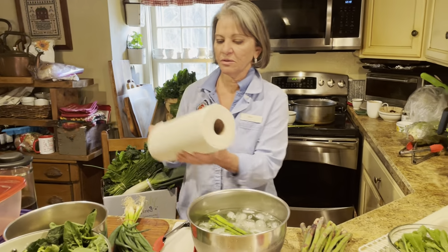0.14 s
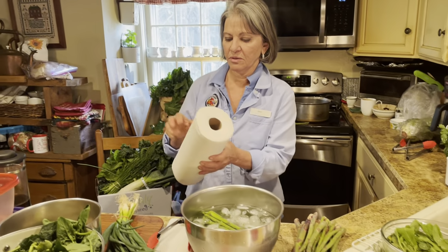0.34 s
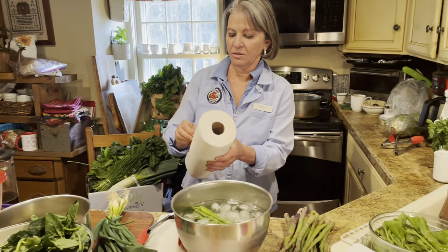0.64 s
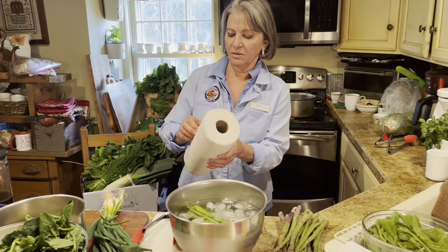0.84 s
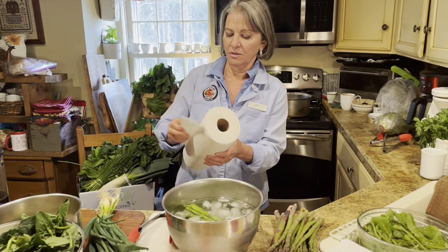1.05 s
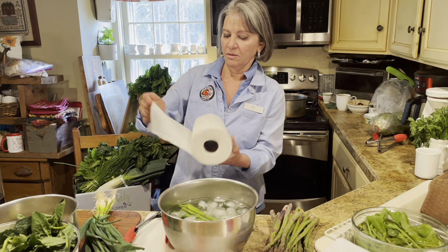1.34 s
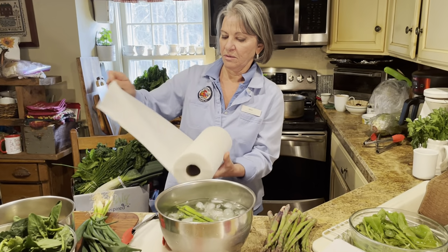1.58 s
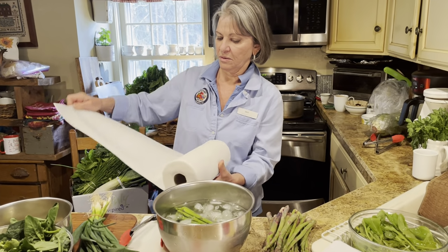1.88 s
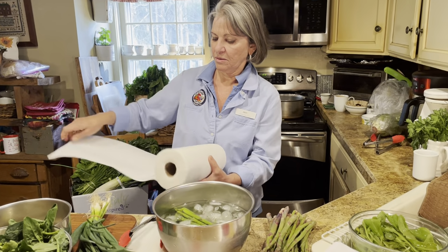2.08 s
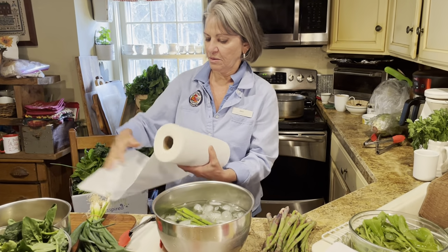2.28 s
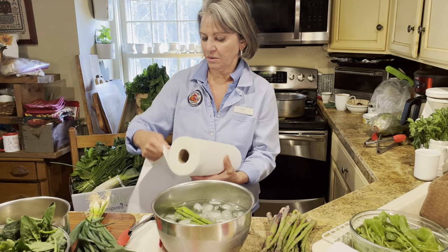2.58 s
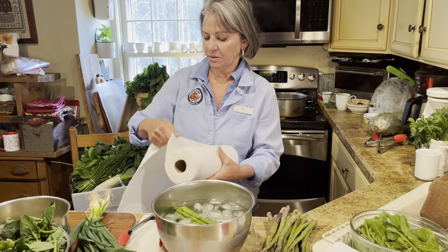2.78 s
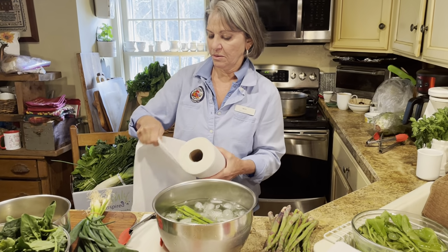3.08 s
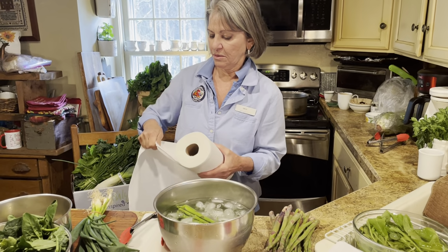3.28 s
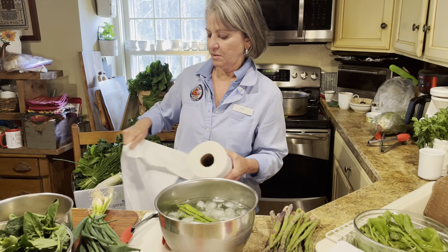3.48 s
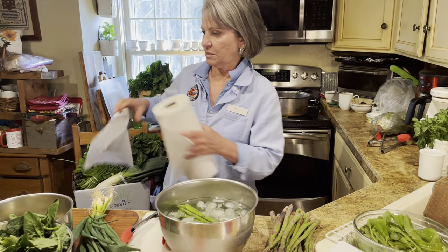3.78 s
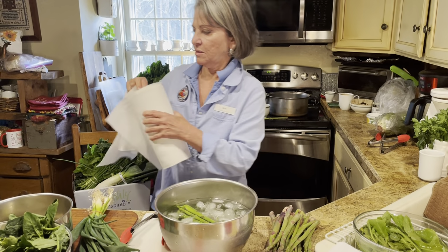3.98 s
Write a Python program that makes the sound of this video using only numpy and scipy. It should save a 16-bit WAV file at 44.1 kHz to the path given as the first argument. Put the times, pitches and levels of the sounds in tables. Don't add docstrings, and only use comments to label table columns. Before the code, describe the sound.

Hands handle and pull a sheet from a paper roll in a kitchen, rustling softly before a quick snap and tear; a low drone wavers behind.

```python
import sys
import numpy as np
from scipy import signal
from scipy.fft import rfft, irfft, next_fast_len
from scipy.io import wavfile
from scipy.ndimage import uniform_filter1d

SR = 44100
rng = np.random.default_rng(int(sys.argv[2]) if len(sys.argv) > 2 else 0)


def boost(x):
    u = np.asarray(x, float) / 20
    return 10 ** u


def store_wav(level_fs):
    pcm = np.round(np.clip(np.atleast_2d(level_fs), -1, 1) * 32767)
    wavfile.write(sys.argv[1], SR, pcm.T.astype(np.int16))


N = 182221
TIME = np.arange(N) / SR
PAD = next_fast_len(N + SR)
HZ = np.maximum(np.arange(PAD // 2 + 1) * SR / PAD, 1)

# (time of full strength [s], level [dB], rise [s], hold [s], fall [s])
SWINGS = [(0.0, -54.5, .02, 0.0027, 0.074), (.49, -65.5, 0.12, 0.0087, 0.18), (.91, -65, 0.071, 0.1, 0.13),
          (1.1, -55, 0.18, 0.027, 0.19), (1.39, -58, 0.24, 0.039, 0.29), (1.52, -57.5, 0.19, 0.23, 0.31),
          (1.96, -74, 0.098, 0.014, 0.097), (2.55, -62, 0.11, 0.025, 0.43), (2.74, -68, 0.12, 0.053, 0.38),
          (3.02, -61, 0.12, 0.015, 0.15), (3.59, -80, 0.057, 0.071, 0.17),
          (3.691, -69.5, 0.11, 0.0051, 0.065), (4.124, -68, 0.019, 0.011, .02)]
# (time of full strength [s], level [dB], rise [s], hold [s], fall [s])
SLIDES = [(0.0, -65, .02, 0.012, 0.2), (.265, -63, 0.039, 0.16, 0.26), (.54, -70.5, 0.2, .02, .2),
          (.65, -68, 0.19, 0.029, 0.11), (.89, -76, 0.022, 0.068, 0.54), (1.07, -67.5, 0.18, 0.04, 0.29),
          (1.4, -71, 0.35, 0.063, 0.55), (1.52, -69.5, 0.3, 0.29, 0.19), (2.0, -86, 0.096, 0.023, 0.085),
          (2.4, -83.5, 0.071, 0.057, .2), (2.55, -70.5, 0.13, 0.015, 0.62),
          (2.72, -74.5, 0.26, 0.15, 0.068), (3.02, -77.5, 0.071, 0.032, 0.16),
          (3.28, -83.5, 0.31, 0.05, 0.064), (3.575, -79.5, 0.04, 0.019, 0.16),
          (3.691, -80, 0.047, 0.0053, 0.11), (4.1, -87, .2, 0.0089, 0.05), (4.124, -83, 0.02, 0.0091, .02)]
# (time of full strength [s], level [dB], rise [s], hold [s], fall [s])
BRUSHES = [(.07, -70, .08, 0.019, 0.043), (.38, -66, 0.14, 0.03, 0.069), (1.14, -72.5, .08, 0.033, .08),
           (.92, -79, 0.049, .04, 0.095), (1.5, -72, .08, .04, .06), (1.59, -72, .05, 0.032, .08),
           (2.03, -84, .05, .02, .08), (2.53, -75.5, 0.054, .03, 0.067), (2.72, -75, 0.12, 0.02, 0.052),
           (2.79, -69, .05, .01, 0.074), (3.06, -77, .04, .02, .06), (3.45, -71, 0.039, 0.019, 0.066),
           (3.22, -79, 0.16, 0.11, .03), (4.04, -92, 0.046, 0.041, 0.049)]
# (time [s], level [dB])
SLACK = [(0, -60), (.3, -65), (.66, -65), (.8, -70.5), (1.7, -61.5), (1.9, -61), (2.0, -62.5), (2.15, -72),
         (2.35, -73), (2.75, -72.5), (3.17, -71), (3.28, -84), (3.6, -71), (3.93, -70.5), (3.972, -67),
         (3.98, -63), (4.035, -76), (4.13, -91)]
# (time [s], level [dB])
TEAR = [
    (3.324, -74),
    (3.328, -50),
    (3.336, -50),
    (3.398, -52.5),
    (3.442, -52.5),
    (3.498, -51),
    (3.52, -59.5),
    (3.535, -61.5),
    (3.58, -66),
]
# (frequency [Hz], level per Hz [dB])
FLAP_TONE = [(150, -2.5), (250, 2.5), (350, -1.5), (550, -0.5), (750, -7.5), (1100, -30)]
# (frequency [Hz], level per Hz [dB])
RUB_TONE = [(450, -35), (750, 3), (1020, -1), (1300, -1), (1720, -5), (2050, -5.5), (2500, -14),
            (3500, -5.5)]
# (frequency [Hz], level per Hz [dB])
HISS_TONE = [(1500, 5.5), (2300, 2), (2900, -1), (4000, -0.5), (5400, -1.5), (7000, 0.5), (8500, -10.5),
             (10500, -11), (13000, -12)]
# (frequency [Hz], level per Hz [dB])
FUZZ_TONE = [(6500, -13), (9000, -1), (11500, -5), (13300, -3), (14800, -6), (15800, -17)]
# (time [s], peak level [dB], burst length [ms])
RIP_SNAPS = [
    (3.3039, -65, 1.3),
    (3.312, -66, 2),
    (3.3209, -66, 1.5),
    (3.3232, -55, 1.0),
    (3.3253, -41.5, 0.81),
    (3.3253, -44, .8),
    (3.3266, -45, 0.65),
    (3.332, -61, 0.72),
    (3.339, -61, 0.8),
]
# (frequency [Hz], width [Hz], level [dB])
EDGE_RINGS = [(2600, 710, -9), (3640, 300, -2), (5410, 330, 6), (6100, 810, -6), (9350, 430, 3),
              (12600, 590, 1), (13500, 1634, -6)]
# (time [s], peak level [dB], centre frequency [Hz], burst length [ms])
TICKS = [(0.2557, -62, 2750, 13), (0.7492, -67, 11610, 9.8), (1.9664, -74.5, 11790, 7.4),
         (1.9988, -63.5, 14120, 8.2), (2.0246, -65.5, 11500, 7.1), (2.154, -73, 12480, 9.8),
         (2.1835, -86, 2530, 7.1), (2.287, -76, 4800, 10), (2.3834, -64, 13090, 9.3),
         (3.1897, -65.5, 13510, 16.4), (3.8213, -70.5, 2660, 20), (3.9442, -70.5, 13100, 10),
         (4.0378, -86, 2522, 9.5), (4.067, -64.5, 13400, 8.9)]
# (time [s], peak level [dB], centre frequency [Hz], burst length [ms])
PRICKS = [(3.3033, -56, 13000, 1.2), (3.3238, -54, 13500, 1.2), (.8045, -67, 13300, 8.7),
          (.829, -79, 13000, 6.0), (.869, -67, 13000, 8.0), (3.3322, -54, 13400, .9),
          (3.3388, -54, 14300, .9), (2.1846, -69.5, 11300, 9.0), (2.2065, -67, 13290, 7.4),
          (2.2275, -69, 13300, 9.1), (2.3682, -68, 13200, 8.1), (2.4515, -67, 13700, 9.0),
          (3.3163, -60, 13300, 1.5), (3.321, -66, 13000, 1.4), (4.0377, -70, 12070, 10.0),
          (4.116, -70, 7000, 8.8), (4.118, -67, 12430, 8.0)]
# (time [s], peak level [dB], frequency
# [Hz], time to fall 60 dB [s])
BUMPS = [(0.004, -39, 247, 0.058), (0.003, -38, 396, 0.069), (.047, -49, 507, 0.067),
         (1.075, -45.5, 1910, 0.044), (1.0, -60, 1200, .05), (1.11, -49, 1200, 0.065),
         (1.125, -44, 405, 0.05), (1.16, -44, 360, .06), (1.75, -51.5, 160, 0.16), (2.27, -52, 258, 0.075),
         (2.509, -67, 435.8, 0.035), (2.635, -58, 524, .04), (2.857, -68, 573.4, 0.039),
         (2.556, -51, 330, 0.059), (2.97, -51, 228, 0.061), (2.534, -48.5, 547, 0.09),
         (2.553, -61, 497, 0.055), (2.586, -45, 545, 0.091), (2.67, -47, 1020, 0.032),
         (2.78, -49, 439, 0.044), (2.894, -45.5, 267.3, 0.063), (3.014, -49, 540, 0.055),
         (3.026, -55, 1180, 0.035), (3.3247, -43, 5300, .012), (3.3262, -44, 5900, .012),
         (3.3255, -43, 3630, .02), (3.3275, -47, 5500, .01), (3.3265, -56, 2300, 0.013),
         (3.33, -41.5, 684, 0.034), (3.345, -50, 2000, 0.023), (3.328, -34, 516, 0.035),
         (3.337, -38, 331.5, 0.25), (3.359, -35, 570, 0.029), (3.363, -47, 335.5, 0.045),
         (3.397, -41, 346, 0.1), (3.417, -40, 477, 0.054), (3.455, -39, 314, 0.069),
         (3.432, -49, 424, 0.042), (3.467, -40, 535, 0.048), (3.482, -39, 473, 0.044),
         (3.683, -53, 630, 0.039), (3.9745, -44.5, 552.4, 0.04)]
# (time [s], peak level [dB], frequency [Hz], time to fall 60 dB [s])
TAP = (3.9095, -52, 850, .035)
# (time [s], peak level [dB], frequency [Hz], time to fall 60 dB [s])
LAST_TAB = (3.5012, -31.5, 326, .07)
# (time [s], frequency of the hollow [Hz], level [dB])
PALM = [
    (.235, 2300, -75),
    (.26, 2488, -67.5),
    (.32, 2794, -72),
    (.42, 2150, -79),
    (.5, 1598, -74),
    (.56, 1280, -84),
    (.64, 1375, -69),
    (.71, 1250, -90),
]
# (start [s], length [s], first frequency [Hz], last frequency [Hz], level [dB])
GLIDES = [(0.21, .04, 1890, 2100, -78), (0.28, 0.066, 1200, 890, -72), (0.27, 0.11, 3200, 2890, -73),
          (.38, 0.07, 2300, 2000, -68), (.4, 0.087, 4800, 4000, -78), (.475, 0.06, 1800, 1400, -70),
          (.48, .05, 720, 990, -69.5), (.61, 0.061, 1506, 1400, -73), (1.055, 0.029, 1720, 1800, -62),
          (1.1, 0.037, 964, 1200, -64), (1.11, 0.062, 1200, 830, -68), (1.089, 0.073, 520, 580, -61.5),
          (1.28, 0.21, 190, 170, -66.5), (1.7, .22, 209, 170, -67), (2.1, 0.26, 270, 250, -68.5),
          (2.03, .07, 410, 500, -68), (2.0, .12, 160, 170, -70.5), (1.55, 0.082, 290, 280, -64),
          (.2, 0.054, 460, 460, -67.5), (3.1, .16, 296, 263, -70), (1.297, 0.14, 1050, 1050, -66.5),
          (1.35, 0.082, 500, 530, -61), (1.52, 0.073, 1250, 1300, -63), (1.551, 0.12, 1600, 1550, -67),
          (1.58, 0.097, 510, 465, -60.5), (1.657, 0.075, 750, 700, -63), (1.798, 0.072, 1200, 1500, -67),
          (2.527, .07, 1400, 1190, -68), (2.6, 0.17, 1950, 1800, -76), (2.55, 0.058, 1000, 1100, -68),
          (3.0, .06, 1060, 1250, -76), (3.335, .04, 1300, 1450, -62.5), (3.385, 0.035, 900, 850, -58),
          (3.35, 0.024, 1150, 1400, -62), (3.46, 0.058, 1100, 980, -62)]
# (time [s], peak level [dB], low edge [Hz], high edge [Hz], length [ms])
CREASE = (3.691, -57, 8000, 10000, 22.0)
# (time [s], twice the turns per second [Hz], second order level [dB], first order level [dB])
MOTOR_LOAD = [(0, 90.7, -47.5, -51.5), (.45, 88.33, -48.5, -50.5), (.82, 89.26, -52, -50),
              (1.0, 88.66, -49.5, -58), (1.14, 87.2, -49, -58), (1.3, 89.24, -52, -53.5),
              (1.55, 88.6, -43, -49.5), (1.9, 90.5, -50.5, -51), (2.2, 89.55, -48.5, -47.5),
              (2.45, 90.7, -49, -54.5), (2.7, 89.76, -45, -56), (3.1, 89.93, -57.5, -52.5),
              (3.4, 89.38, -50, -49), (3.8, 90.1, -49, -52), (3.95, 89.9, -51, -56),
              (4.05, 89.2, -51.5, -48), (4.13, 88, -49, -53)]
# (time [s], second order dip [dB], first order dip [dB], half width [s])
NULLS = [(0.242, -1.5, 8, 0.03), (.5, 10, 8, 0.036), (.62, 3, 8, 0.082), (0.766, 20, 27, 0.028),
         (.87, 2.5, 30, 0.045), (1.058, 6, -6, 0.039), (1.14, -4, 3, 0.023), (1.25, 2, 4, 0.09),
         (1.47, 17, 23, 0.094), (1.589, 12.5, 10, 0.026), (1.69, 10, 2, 0.084), (1.74, 5, 15, 0.032),
         (2.0, 27, 11, 0.057), (2.132, 3, 21, 0.05), (2.27, 3, 22, 0.071), (2.391, 15, 16, 0.086),
         (2.808, 6, 3, 0.1), (2.9, -2.5, 6, 0.12), (3.27, -2, 26, 0.052), (3.45, 0.5, 13, 0.13),
         (3.57, 3.5, 1, 0.098), (3.68, 4, 3, 0.045), (3.93, 17, -1, 0.037)]
# (time [s], level [dB])
WHINE = [
    (0, -100),
    (3.05, -100),
    (3.15, -85),
    (3.3, -82),
    (3.6, -109),
    (3.78, -80.5),
    (4.05, -78.5),
    (4.13, -98),
]
# (frequency [Hz], level per Hz [dB])
AIR_TONE = [(34, -28), (42, -6), (65, 3.5), (100, 3), (140, -11), (200, -16.5), (270, -19.5), (400, -23),
            (650, -33), (1200, -33.5), (2000, -45.5), (4000, -51), (8500, -68), (13300, -40.5),
            (15800, -60)]
# (frequency [Hz], left minus right [dB], likeness [0-1],
# how far the right leads [radians])
PORTS = [(60, -3.3, .97, .05), (150, -1.3, .74, .08), (400, -1.2, .9, -.2), (600, -.1, .5, -.3),
         (1200, .5, .45, .05), (2000, -1.1, .6, -.2), (3000, 1.7, .5, -.9), (4200, 4.2, .45, -1.0),
         (5300, 7.5, .38, -.2), (6500, 4.6, .45, 1.3), (7600, .6, .6, 2.5), (8900, -.1, .94, 3.14),
         (10000, -.1, .85, 4.05), (12000, .05, .82, 5.2), (13200, .01, .995, 6.27)]

SWING_DB, SLIDE_DB = (-0.5, -5, -24, -19.5), (-8, -9, -1, -4.5)
TEAR_DB, SLACK_DB = (0, -6.5, -20, -22.5), (-0.5, -12, -36, -51)
REST_DB = (-77.5, -82.5, -103, -102)
SNAP_HISS_DB, SNAP_FALL_S = 9.5, 0.082
SHEET_LOOSE_HZ, SHEET_HZ_PER_DB, SHEET_TORN_HZ = 255, 14, 360
RUB_HZ, RUB_SLIDE_HZ, RUB_TORN_HZ = 1220, 1200, 910
RUB_HZ_PER_RISE = 0.52
CRACK_S, CRACK_DB = 3.3258, -21.5
PALM_WIDTH_HZ, GLIDE_WIDTH_HZ = 540, 73
THIRD_ORDER_DB, MOTOR_WOBBLE, WHINE_HZ = -21, 0.017, 1117
AIR_DB, SELF_NOISE_DB = -57, -82
KITCHEN_T60_S, KITCHEN_DB = 0.17, -14.5


def handling():
    flap_db, rub_db, hiss_db, fuzz_db, sheet_hz, rub_hz = efforts()
    flap = friction(1500., spread_db=-0.5, clump_db=1.8, clump_per_s=12.6)
    flap = sheet_modes(flap, 174.2, 996, count=16, sharpness=13.3, patch_db=2.14, change_per_s=8.2,
                       favoured=sheet_hz, fall_db=4.5)
    rub = friction(5000., spread_db=0.5, clump_db=-0.2, clump_per_s=30.0)
    rub = sheet_modes(rub, 518.7, 3198, count=26, sharpness=11.4, patch_db=0.88, change_per_s=14.,
                      favoured=rub_hz, fall_db=7.5)
    hiss = friction(20000., spread_db=2.0, clump_db=-0.5, clump_per_s=24.0)
    hiss = sheet_modes(hiss, 1763, 12500, count=30, sharpness=16.3, patch_db=0.5, change_per_s=4.4)
    fuzz = friction(22000., spread_db=-2.5, clump_db=0.6, clump_per_s=67.0)
    low = boost(flap_db - 1.72) * evened(colour(flap, FLAP_TONE), 1.0)
    middle = boost(rub_db + 1.4) * evened(colour(rub, RUB_TONE), 0.9)
    high = boost(hiss_db + 2.0) * colour(hiss, HISS_TONE)
    return low + middle + high + boost(fuzz_db + 1.0) * colour(fuzz, FUZZ_TONE)


def efforts():
    swing, slide, slack = moves(SWINGS), moves(SLIDES), power_of(in_time(SLACK)[0])
    tearing = (TIME > TEAR[0][0]) * (TIME < TEAR[-1][0])
    tear = power_of(in_time(TEAR)[0]) * tearing
    snap_db = SNAP_HISS_DB * np.exp(-np.abs(TIME - TEAR[1][0]) / SNAP_FALL_S)
    snap = tear * (power_of(snap_db) - 1)
    pairs = [(SWING_DB, swing), (SLIDE_DB, slide), (TEAR_DB, tear), (SLACK_DB, slack), (REST_DB, 1)]
    parts = [power_of(db)[:, None] * strength for db, strength in pairs]
    swung, slid, torn, slackened, _ = parts
    power = sum(parts) + power_of(TEAR_DB)[:, None] * snap * [[0], [0], [1], [1]]
    power[3] += moves(BRUSHES)
    level_db = 10 * np.log10(power)
    pull_db = np.maximum(10 * np.log10(power[0] - 0.9 * slackened[0]) + 74, 0)
    taut_hz = SHEET_LOOSE_HZ + SHEET_HZ_PER_DB * pull_db
    sheet_hz = taut_hz + (SHEET_TORN_HZ - taut_hz) * torn[0] / power[0]
    rub_shift = (RUB_SLIDE_HZ - RUB_HZ) * slid[1] + (RUB_TORN_HZ - RUB_HZ) * torn[1]
    rub_hz = RUB_HZ + rub_shift / power[1]
    rise = uniform_filter1d(np.gradient(10 * np.log10(swing + 1e-8)) * SR, size=2000)
    rub_hz += RUB_HZ_PER_RISE * np.clip(rise, -100, 130) * swung[1] / power[1]
    return *level_db, sheet_hz, rub_hz


def moves(rows):
    s, db, rise, hold, fall = np.transpose(rows)[:, :, None]
    coarse = TIME[::32]
    before = np.maximum(s - coarse, 0) / np.maximum(rise, .005)
    after = np.maximum(coarse - s - hold, 0) / np.maximum(fall, .005)
    return np.interp(TIME, coarse, np.sum(power_of(db - 20 * (before + after)), axis=0))


def friction(per_s, spread_db, clump_db, clump_per_s):
    strength = boost(spread_db * np.minimum(rng.exponential(1, N), 4.0))
    catch = (rng.random(N) < per_s / SR) * strength
    return catch * boost(clump_db * drift(clump_per_s)) * rng.standard_normal((2, N))


def sheet_modes(x, low_hz, high_hz, count, sharpness, patch_db, change_per_s, favoured=1., fall_db=0.):
    out = 0
    modes_hz = np.geomspace(low_hz, high_hz, count) * boost(rng.normal(0, 0.08, count))
    for k, hz in enumerate(modes_hz):
        lean_db = -fall_db * np.minimum(np.abs(np.log2(hz / favoured)), 1.7)
        gain = boost(lean_db + patch_db * drift(change_per_s))
        out = out + (-1) ** k * gain * resonate(x, hz, hz / sharpness)
    return out


def evened(x, share):
    level = np.sqrt(uniform_filter1d(np.mean(x ** 2, axis=0), size=3000) + 1e-6)
    return rms_one(x / level ** np.clip(share, 0, 1))


def rip():
    gate = np.zeros(N)
    for s, peak_db, ms in RIP_SNAPS:
        span, shape = burst(s, ms)
        gate[span] += boost(peak_db) * shape
    snaps = gate * rng.standard_normal((2, N)) + 1e-18
    snaps[:, round(CRACK_S * SR)] += boost(CRACK_DB) * np.array([1, -1])
    out = 0
    for k, (hz, width_hz, db) in enumerate(EDGE_RINGS):
        out = out + (-1) ** k * 1.54 * boost(db) * resonate(snaps, hz, width_hz)
    return out


def ticks(rows, broad):
    out = np.zeros((2, N))
    noise = rng.standard_normal((len(rows), 2, int(.06 * SR)))
    for (s, peak_db, hz, ms), puff in zip(rows, noise):
        span, shape = burst(s, ms)
        narrow = 0.64 * rms_one(resonate(puff, hz, 0.23 * hz))
        tone = narrow + broad * rms_one(resonate(puff, 8400, 5000))
        out[:, span] += boost(peak_db - 4.0) * shape * tone[:, :len(shape)]
    return out


def bumps():
    out = np.zeros(N)
    for s, peak_db, hz, t60 in list(BUMPS) + [TAP, LAST_TAB]:
        start = round(s * SR)
        t = TIME[:min(SR // 4, N - start)]
        modes = np.sin(2 * np.pi * hz * t) + 0.22 * np.sin(2 * np.pi * 1.6 * hz * t)
        fade = boost(peak_db - 6.5 - 60 * t / max(t60, .005))
        out[start:start + len(t)] += fade * (1 - np.exp(-t / 0.00051)) * modes
    return out


def palm():
    hz, level_db = in_time(PALM)
    slow = slow_noise(rng.standard_normal((2, N)), PALM_WIDTH_HZ)
    inside = (TIME > PALM[0][0]) & (TIME < PALM[-1][0])
    return inside * boost(level_db) * rms_one(slow * np.cos(np.cumsum(2 * np.pi * hz / SR)))


def glides():
    out = np.zeros((2, N))
    noise = rng.standard_normal((len(GLIDES), 2, SR // 3))
    slow = slow_noise(noise, GLIDE_WIDTH_HZ)[..., SR // 20:]
    for (s, length, first_hz, last_hz, db), rough in zip(GLIDES, slow):
        along = np.linspace(0, 1, round(length * SR))
        turn = np.cumsum(2 * np.pi * (first_hz + (last_hz - first_hz) * along) / SR)
        song = rms_one((1 + rms_one(rough[:, :len(along)])) * np.sin(turn))
        start = round(s * SR)
        out[:, start:start + len(along)] += boost(db) * np.sin(np.pi * along) * song
    return out


def crease():
    s, peak_db, low_hz, high_hz, ms = CREASE
    swell = np.cos(np.pi * np.clip(1000 * (TIME - s) / ms, -.5, .5))
    band = signal.butter(4, [low_hz, high_hz], "band", fs=SR, output="sos")
    rasp = rms_one(signal.sosfilt(band, rng.standard_normal(N)))
    return boost(peak_db) * swell * rasp * [[.15], [1]]


def motor():
    s, *dip_db, width = np.transpose(NULLS)[:, :, None]
    near = np.maximum(1 - np.abs(TIME - s) / np.maximum(width, .01), 0)
    hz, *load_db = in_time(MOTOR_LOAD)
    second_db, first_db = np.array(load_db) - np.sum(dip_db * near, axis=1)
    turn = np.cumsum(np.pi * hz * (1 + MOTOR_WOBBLE * drift(5.64)) / SR)
    first_turn = np.cumsum(2 * np.pi * 45.5 * (1 + 0.021 * drift(23.0)) / SR)
    first = boost(first_db - 5.5) * np.sin(first_turn)
    second = boost(second_db - 1.7) * np.sin(2 * turn)
    third_db = (load_db[0] + second_db) / 2 + THIRD_ORDER_DB + 4.1 * drift(2.0)
    third = boost(third_db) * np.sin(3 * turn)
    whine = boost(in_time(WHINE)[0]) * np.sin(2 * np.pi * WHINE_HZ * TIME + 0.41 * drift(25.0))
    return np.sqrt(2) * (second + first + third + whine)


def room_air():
    return boost(AIR_DB) * colour(rng.standard_normal((2, N)), AIR_TONE)


def kitchen(x):
    t = TIME[:SR // 2]
    tail = rng.standard_normal((2, len(t))) * boost(-60 * t / KITCHEN_T60_S) * (t > .004)
    tail = signal.lfilter([.4], [1, -.6], tail)
    return signal.fftconvolve(x, tail / np.sqrt(np.sum(tail ** 2) / 2), axes=1)[:, :N]


def power_of(db):
    return boost(2 * np.asarray(db))


def rms_one(x):
    return x / np.sqrt(np.mean(x ** 2) + 1e-20)


def in_time(rows):
    s, *columns = np.transpose(rows)
    return [np.interp(TIME, s, c) for c in columns]


def in_pitch(rows):
    hz, *columns = np.transpose(rows)
    return [np.interp(np.log(HZ), np.log(hz), c) for c in columns]


def colour(x, spectrum):
    shaped = rfft(x, PAD) * boost(in_pitch(spectrum)[0])
    return rms_one(irfft(shaped, PAD)[..., :N])


def drift(per_s):
    r = np.exp(-2 * np.pi * per_s / SR)
    return rms_one(signal.lfilter([1], [1, -2 * r, r * r], rng.standard_normal(N + SR))[SR:])


def slow_noise(noise, width_hz):
    return signal.sosfilt(signal.butter(2, width_hz / 2, fs=SR, output="sos"), noise)


def resonate(x, hz, width_hz):
    r = np.exp(-np.pi * width_hz / SR)
    poles = [1, -2 * r * np.cos(2 * np.pi * hz / SR), r * r]
    return signal.lfilter([(1 - r * r) / 2, 0, (r * r - 1) / 2], poles, x)


def burst(s, ms):
    start = round(s * SR)
    t = (np.arange(int(.06 * SR)) / SR)[:N - start]
    shape = (1 - np.exp(-t / 0.00031)) * np.exp(-1000 * t / ms)
    return slice(start, start + len(t)), shape / shape.max()


def scene():
    events = ticks(TICKS, broad=0.52) + rip() + bumps() * [[1], [.4]]
    paper = handling() + palm() + crease() + events + boost(KITCHEN_DB) * kitchen(events)
    paper = paper + ticks(PRICKS, broad=0.085) + glides() * [[1], [.7]]
    return paper + motor() * [[1], [.45]] + room_air()


def top_cut(x):
    return signal.sosfilt(signal.butter(12, 15730, fs=SR, output="sos"), x)


def record(dry):
    tilt_db, alike, lead = in_pitch(PORTS)
    alike = np.clip(alike, 0, 1)
    shared, own = rfft(dry, PAD)
    left = shared * boost(tilt_db / 2)
    right = alike * np.exp(1j * lead) * shared + np.sqrt(1 - alike ** 2) * own
    right = right * boost(-tilt_db / 2)
    pair = irfft(np.array([left, right]), PAD)[:, :N]
    pair = pair + boost(SELF_NOISE_DB) * rng.standard_normal((2, N))
    return top_cut(pair)


dry = scene()
out = record(dry)
store_wav(out)
```